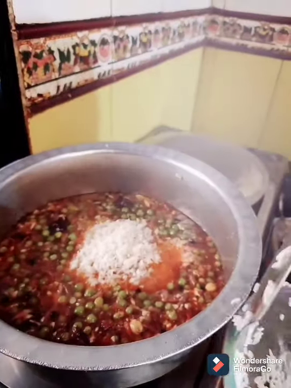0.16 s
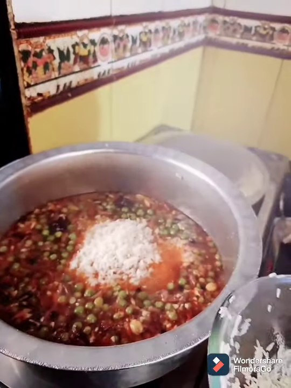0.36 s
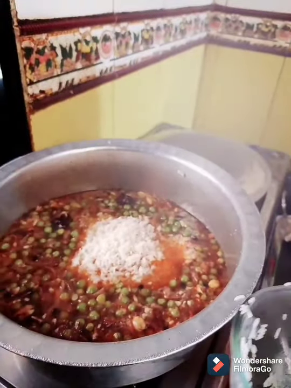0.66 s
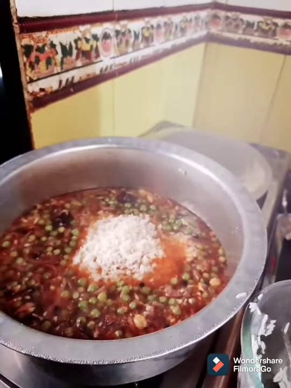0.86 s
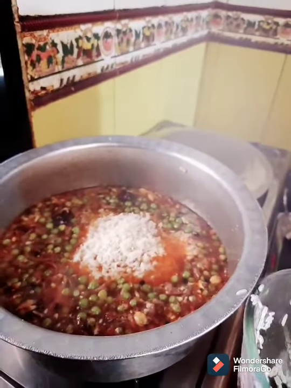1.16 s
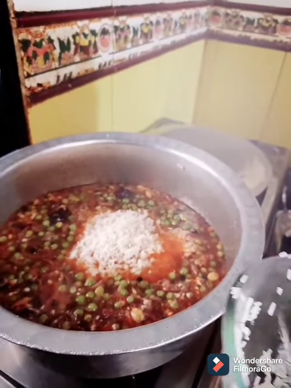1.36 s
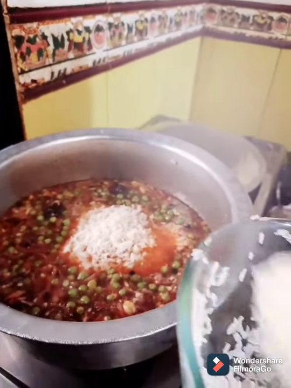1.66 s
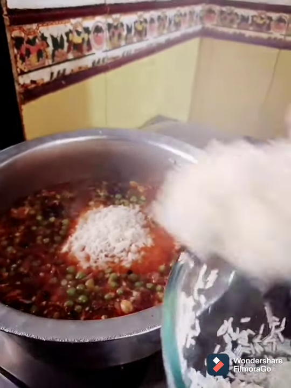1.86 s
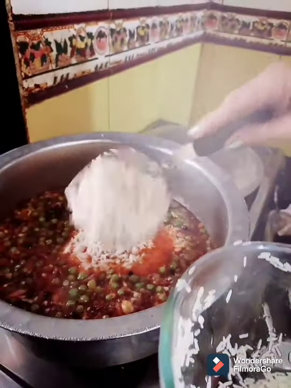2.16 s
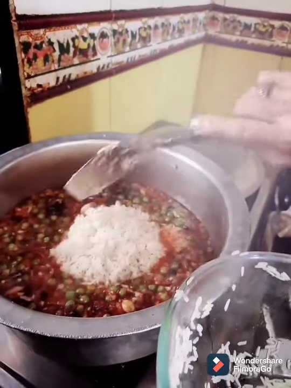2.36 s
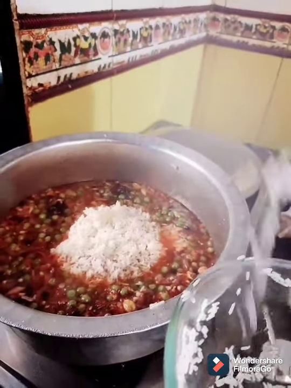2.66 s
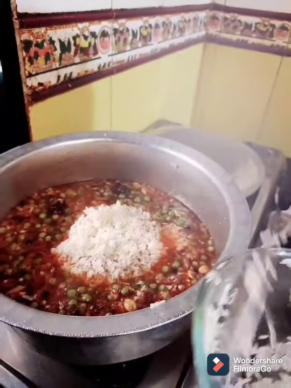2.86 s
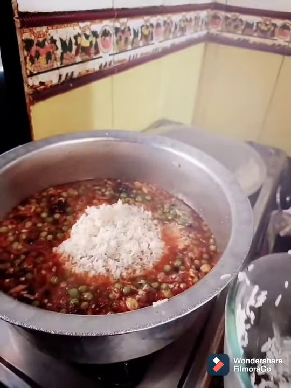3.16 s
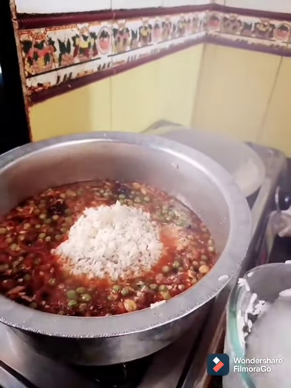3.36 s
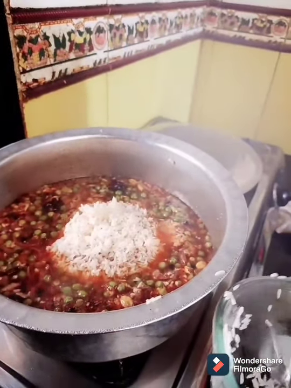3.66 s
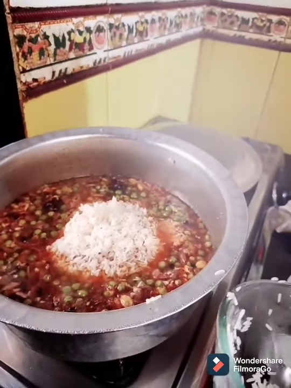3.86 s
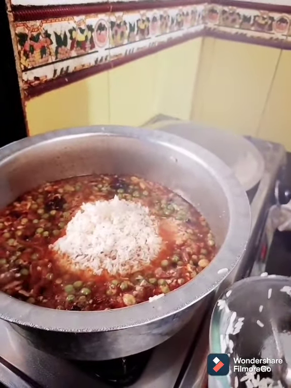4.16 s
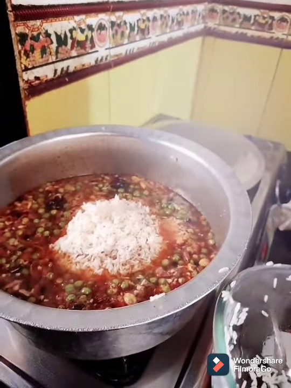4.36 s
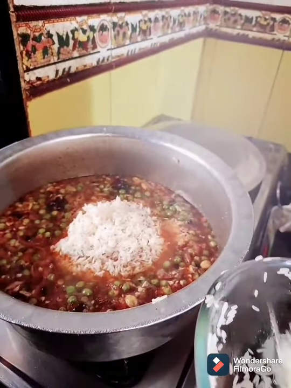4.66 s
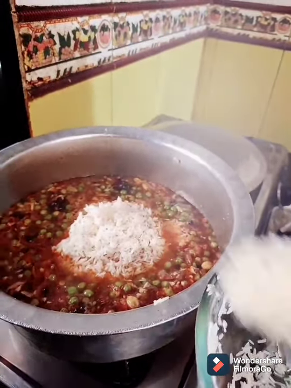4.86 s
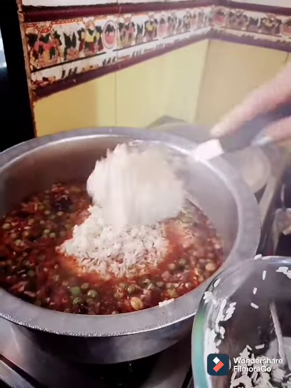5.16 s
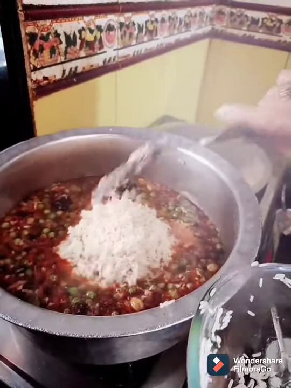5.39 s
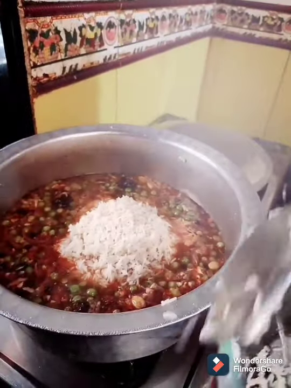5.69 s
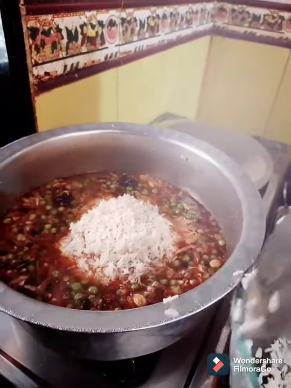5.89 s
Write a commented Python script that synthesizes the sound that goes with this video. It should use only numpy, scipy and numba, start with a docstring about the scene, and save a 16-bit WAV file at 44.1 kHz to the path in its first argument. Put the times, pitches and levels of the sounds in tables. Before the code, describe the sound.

Close in a small tiled kitchen, a steel spoon knocks a glass bowl and rasps through wet rice, with a dull tap on the pot rim. A spoonful of grains patters into the broth, then more scraping and dull touches follow, a second softer patter, and final bright clinks. A pot simmers gently throughout over a rumbling, hissing gas flame.

```python
"""A steel spoon knocks and scrapes in a glass bowl of wet rice: decaying modes, noise cracks and rasping grains.
Air cupped between spoon and bowl hums; two spoonfuls of rice patter into the broth as showers of clicks.
Beside it a wide pot simmers on a gas ring: bubbles are short ringing sines, and the flame is
coloured noise that rumbles and hisses, with narrow resonances.
A phone microphone with gain control stands close by in a small tiled kitchen."""
import sys
import numpy as np
from scipy import signal
from scipy.fft import rfft, irfft, next_fast_len
from scipy.io import wavfile
from scipy.ndimage import uniform_filter1d
from numba import njit

SR = 44100
rng = np.random.default_rng(int(sys.argv[2]) if len(sys.argv) > 2 else 0)


def invert_db(level):
    """Linear amplitude ratio for a level in decibels (20 dB per decade), elementwise."""
    return 10 ** (np.asarray(level, dtype=float) / 20)


def to_wav(sig):
    """Store sig (one row per channel, or 1-D mono) as 16-bit WAV at the path in sys.argv[1].

    Samples outside -1..1 are clipped; the rate is SR.
    """
    pcm = np.clip(np.atleast_2d(sig), -1, 1) * 32767
    pcm = np.round(pcm).astype(np.int16)
    wavfile.write(sys.argv[1], SR, pcm.T)  # frames by channels


N = 265923   # samples
CONTACT_S = .0015   # contact time of a blow

# spoon dragged over rice and glass, one list a stroke:
# (time [s], drag level [dB], lean to spoon ring (+) or bowl ring (-) [dB, before scaling])
SCRAPES = [
    [(0.19, -41, 1), (0.21, -21.5, -10), (0.262, -57, 4), (0.27, -40, 9.5), (0.31, -70, -2)],
    [(0.74, -31, 13), (0.782, -38.5, -4), (0.88, -31, 6), (0.91, -47, -13), (0.916, -50, 2),
     (0.97, -40.5, 7)],
    [(0.99, -47, -4), (1.004, -48, 0), (1.04, -37.5, 3), (1.06, -49, 2), (1.074, -40.5, 4), (1.16, -67, 8)],
    [(3.09, -33, 4), (3.114, -30, 18), (3.174, -25.5, 17), (3.228, -41, 4), (3.25, -41, 4)],
    [(3.26, -43, -1), (3.294, -27.5, 3), (3.378, -81, 7), (3.412, -42, 4), (3.44, -53, 4)],
    [(3.54, -35, -6), (3.578, -40, 11), (3.602, -29, 18), (3.636, -49, 4), (3.665, -56, 4)],
    [(3.69, -36, 15), (3.754, -35.5, 13), (3.78, -52, 4)],
    [(3.81, -46, 4), (3.838, -40, 4), (3.994, -28.5, 2), (4.038, -41.5, 10), (4.12, -47, -4),
     (4.13, -36, 1)],
    [(4.14, -47, 0), (4.348, -44.5, 0), (4.39, -58, 4), (4.444, -49, 6), (4.46, -58, 4), (4.5, -56, 2)],
    [(5.58, -59, -12), (5.64, -60, -20), (5.77, -60, -18), (5.81, -48, -7)],
]


def rms_one(x):
    """Normalization: scale a signal to unit rms."""
    return x / np.sqrt(np.mean(x ** 2) + 1e-20)


def at_hz(points, hz):
    """Logarithmic frequency scale: interpolate a table's second column over log frequency."""
    points = np.array(points)
    return np.interp(np.log(hz), np.log(points[:, 0]), points[:, 1])


def octaves(hz):
    """Musical interval: distance from 3000 Hz in octaves."""
    return np.log2(hz / 3000)


def drift(rate):
    """Low-passed noise: a slow random wander of unit rms, with two poles at rate [Hz]."""
    step = 40   # samples between computed points
    r = np.exp(-2 * np.pi * rate * step / SR)
    white = rng.standard_normal(N // step + 2002)
    slow = signal.lfilter([1], [1, -2 * r, r * r], white)[2000:]
    return np.interp(np.arange(N) / step, np.arange(len(slow)), rms_one(slow))


def grains(per_s, spread_db):
    """Poisson-like impulse train: random clicks of uneven size and sign."""
    sizes = invert_db(spread_db * np.minimum(rng.exponential(1, N), 5)) * rng.choice([-1, 1], N)
    return sizes * (rng.random(N) < per_s / SR)


def ring(clicks, hz, t60):
    """Damped oscillator: a unit click starts a decaying sine of initial height 1."""
    r, w = invert_db(-60 / (t60 * SR)), 2 * np.pi * hz / SR
    return signal.lfilter([0, np.sin(w)], [1, -2 * r * np.cos(w), r * r], clicks + 1e-18)


def resonance(x, hz, width_hz):
    """Driven resonator: a two-pole band-pass with about unit gain at its peak."""
    r = np.exp(-np.pi * width_hz / SR)
    poles = [1, -2 * r * np.cos(2 * np.pi * hz / SR), r * r]
    return signal.lfilter([(1 - r * r) / 2, 0, (r * r - 1) / 2], poles, x)


def colour(x, spectrum):
    """Spectral shaping: filter a steady noise by a table of levels, to unit rms."""
    hz = np.maximum(np.arange(N // 2 + 1) * SR / N, 1)
    return rms_one(irfft(rfft(x) * invert_db(at_hz(spectrum, hz)), N))


def gains(strokes, lean):
    """Friction envelope: drag gain in time, tilted by lean toward spoon or bowl, silent between strokes."""
    t, gain = np.arange(N) / SR, 0
    for stroke in strokes:
        s, drag_db, steel_db = np.transpose(stroke)
        gain = gain + invert_db(np.interp(t, s, drag_db + lean * steel_db, -150, -150))
    return gain


def spoon_in_bowl():
    """Modal excitation: blows and friction drive glass, steel and pot; cracks, rasp and hum join them."""
    # clear clinks: (time [s], bowl ring [dB], spoon ring [dB], knock [dB], hardness [dB per octave])
    blows = [(0.0445, -13.5, -15, -21.5, 2), (0.085, -35, -27.5, -14.5, 3), (0.2064, -30.5, -45, -33, 2),
             (0.6301, -34, -16, -38, 0), (0.6997, -26.5, -21.5, -30.5, -1), (3.0755, -50, -30.5, -48, 1),
             (3.5304, -60, -34, -60, -3.5), (3.6711, -39, -33, -45, 0), (5.8195, -14.5, -22, -29, 2),
             (5.9926, -21.5, -32, -22.5, 2), (6.0027, -31, -46, -28, 1)]
    # dull touches cushioned by rice: (time [s], crack level [dB], hardness [dB per octave])
    soft_blows = [(0.268, -18, 1), (0.9192, -17.5, -2.5), (1.0748, -20, -4.5), (3.5165, -24, -2),
                  (3.7861, -2, -3.5), (4.085, -19.5, -6), (4.1658, -18.5, -8), (4.2605, -26, 0.5),
                  (4.339, -26.5, 2), (4.4363, -40, 8), (5.4814, -36, 6.5), (5.7883, -21, -3)]
    # taps on the pot rim: (time [s], crack level [dB], ring level [dB], hardness [dB per octave])
    pot_blows = [(0.0, -15, -28.5, -4.5), (0.083, 3, -23.5, -4.5), (0.4805, -8.5, -25.5, -4),
                 (2.668, -19, -42, -6.5), (4.694, -26, -47, -4)]
    # modes of the glass bowl: (frequency [Hz], relative level [dB], t60 before the cap in struck [s])
    bowl_modes = [(1435, -7.5, 0.09), (2250, -14, 0.27), (2525, -6.5, 0.15), (2570, -9.5, 0.12),
                  (3530, -17, 0.11), (3953, -5, 0.11), (3994, -2, 0.049), (5500, -37, 0.067),
                  (5633, 2.5, 0.055), (7000, -19.5, 0.089), (7870, -3.5, 0.085), (7980, 4, 0.041),
                  (8040, -3, 0.078), (8430, -19, 0.1), (9000, -4, 0.15), (10260, -6, 0.14),
                  (10200, 0.5, 0.047), (10830, -14, 0.24), (12430, -7, 0.18), (12800, -29, 0.19),
                  (13670, -11, 0.087), (15450, -16, 0.063)]
    # modes of the steel spoon, same columns: (frequency [Hz], relative level [dB], t60 before the cap [s])
    spoon_modes = [(2680, -11.5, 0.049), (2786, -1, 0.045), (3845, -6.5, 0.053), (4304, -2, 0.061),
                   (4600, -11, 0.15), (5600, -27, 0.11), (6080, -18, 0.24), (5906, -4, 0.091),
                   (6600, -29, 0.087), (7510, -9, 0.11), (8100, -9.5, 0.074), (8000, -8.5, 0.2),
                   (8710, -5.5, 0.14), (8600, -10.5, 0.054), (9520, -2.5, 0.17), (10060, -25, 0.088),
                   (11480, -9.5, 0.23), (11000, -21, 0.092), (11540, -19, 0.096), (12460, -14, 0.078),
                   (12750, -9, 0.11), (13500, -15, 0.074), (14400, -13, 0.088), (15500, -1, .08)]
    # whole bowl flexing: (frequency [Hz], relative level [dB], t60 [s])
    knock_modes = [(604, -1, 0.08), (642, -7, 0.057), (701, -18, 0.1), (886, -22, 0.064)]
    # modes of the pot: (frequency [Hz], relative level [dB], t60 [s])
    pot_modes = [(296, -27.5, 0.17), (1136, -20, 0.074), (1196, -12.5, 0.14), (1550, -10.5, 0.051),
                 (1840, -12, 0.091), (1834, -13, 0.086), (2474, -7, 0.051), (2717, 3.5, 0.025),
                 (3160, -17, 0.14), (3930, -9.5, 0.12), (4150, -43, 0.14), (6360, -17, 0.093)]
    clink_crack_db = 18.5   # crack of a clink over its louder ring
    touch_ring_db, touch_knock_db = -30.5, -29   # ring and knock of a touch relative to its crack
    bowl_rub_db, spoon_rub_db = -42, -41.5   # drive by the drag
    thud_cut_hz = 550

    clinks = [(s, max(bowl, spoon) + clink_crack_db, bowl, spoon, knock, hard)
              for s, bowl, spoon, knock, hard in blows]
    touches = [(s, db, db + touch_ring_db, db + touch_ring_db, db + touch_knock_db, hard)
               for s, db, hard in soft_blows]
    s, crack_db, bowl_db, spoon_db, knock_db, hardness = np.transpose(sorted(clinks + touches))
    pot_s, pot_crack_db, pot_db, pot_hardness = np.transpose(pot_blows)

    rub = rms_one(grains(3700, spread_db=6.0))
    bowl_rub = rub * gains(SCRAPES, -0.65) * invert_db(bowl_rub_db)
    spoon_rub = rub * gains(SCRAPES, 0.27) * invert_db(spoon_rub_db)
    no_rub = np.zeros(N)
    rings = struck(bowl_modes, s, bowl_db, hardness, bowl_rub)
    rings += struck(spoon_modes, s, spoon_db, hardness, spoon_rub)
    rings += struck(knock_modes, s, knock_db, 0, no_rub)
    rings = signal.sosfilt(signal.butter(4, thud_cut_hz, "high", fs=SR, output="sos"), rings)
    rings += struck(pot_modes, pot_s, pot_db, pot_hardness, no_rub, rattle_t60=0.024, chatter=0.27)
    crack = cracks(s, crack_db, hardness) + cracks(pot_s, pot_crack_db, pot_hardness)
    return rings + crack + rasp() + hollow()


def struck(modes, s, blow_db, hardness, rub, rattle_t60=0.031, chatter=0.16):
    """Modal superposition: each blow excites each mode unevenly; greater hardness tilts it brighter."""
    blur_share, blur_per_s = .008, 50   # hand and rice load the walls, so each mode wavers in pitch
    wander_db, wander_per_s = 4.5, 12   # the moving contact favours now one mode, now another
    longest_t60 = .22   # s
    at, out = np.maximum((s - CONTACT_S / 2) * SR, 0).astype(int), np.zeros(N)
    uneven_db = rng.normal(0, 2.4, (len(s), len(modes)))
    noise = grains(9000, spread_db=3.0)
    waver = 1 + blur_share * drift(blur_per_s)
    fade = invert_db(-60 / (rattle_t60 * SR))
    for k, (hz, level_db, t60) in enumerate(modes):
        strengths = invert_db(blow_db + hardness * octaves(hz) + level_db + uneven_db[:, k])
        pole = invert_db(-60 / (min(t60, longest_t60) * SR))
        wander = invert_db(level_db + wander_db * drift(wander_per_s))
        # each mode reads the waver from another starting point
        turn = 2 * np.pi * hz / SR * np.roll(waver, k * N // len(modes))
        out += rattle(at, strengths, noise, rub * wander, pole, turn, fade, chatter)
    return out


@njit
def rattle(at, strengths, noise, rub, pole, turn, fade, chatter):
    """Forced damped oscillator: one mode driven by clicks, the dying rattle after each, and rubbing."""
    out, loose, j = np.zeros(len(noise)), 0., 0
    for i in range(2, len(noise)):
        push = rub[i]
        if j < len(at) and i >= at[j]:
            push += strengths[j]
            loose += chatter * strengths[j]
            j += 1
        loose *= fade
        drive = np.sin(turn[i]) * (push + loose * noise[i])
        out[i] = 2 * pole * np.cos(turn[i]) * out[i - 1] - pole * pole * out[i - 2] + drive
    return out


def cracks(s, crack_db, hardness):
    """High modal density: countless close modes blur to noise that swells briefly and dies band by band."""
    # spectrum of a crack: (frequency [Hz], relative density [dB per Hz])
    density = [(180, -58), (300, -26), (1400, -10.5), (1860, -1), (2550, -24), (3110, -11.5), (3990, 0.5),
               (4790, -3.5), (15800, -4.5)]
    # longer dying of a crack: (frequency [Hz], t60 [s])
    dying_t60 = [(300, 0.065), (1000, 0.056), (4000, 0.094), (15000, 0.16)]
    snap_t60_s, snap_db = 0.025, 2   # the first instants of a crack, over its longer dying
    out, edges = np.zeros(N), 300 * 2 ** np.arange(0, 5.8, .38)   # Hz
    white, at = rng.standard_normal((2, N)), np.maximum((s - CONTACT_S) * SR, 0).astype(int)
    uneven_db = rng.normal(0, 0.89, (len(s), len(edges)))
    swell = np.exp(-1 / (CONTACT_S * SR))
    snap_pole = invert_db(-60 / (snap_t60_s * SR))
    for k, (low, high) in enumerate(zip(edges, edges[1:])):
        hz, hits = np.sqrt(low * high), np.full(N, 1e-18)
        hits[at] = invert_db(crack_db + hardness * octaves(hz) + at_hz(density, hz) - 13.0 + uneven_db[:, k])
        pole = invert_db(-60 / (at_hz(dying_t60, hz) * SR))
        envelope = signal.lfilter([1 - swell], np.convolve([1, -pole], [1, -swell]), hits)
        snap = signal.lfilter([1 - swell], np.convolve([1, -snap_pole], [1, -swell]), hits)
        envelope += invert_db(snap_db) * snap
        band = signal.butter(2, [low, high], "band", fs=SR, output="sos")
        out += envelope * signal.sosfilt(band, white[k % 2])
    return out


def rasp():
    """Granular friction: wet grains grate under the spoon; the shifting heap rings in changing bands."""
    # spectrum of the grating: (frequency [Hz], relative level [dB])
    drag_spectrum = [(590, -20), (1000, -42.5), (1450, -4), (1840, -15.5), (2430, -0.5), (2800, -16),
                     (3290, -7), (4000, -3.5), (5460, -1.5), (6420, -1), (13400, -0.5), (15800, -11)]
    rasp_db = -2   # over the drag level
    patchy_db, shifts_per_s, width_share = 4, 12, .05   # bands that come and go; width over frequency
    grating, patches = colour(grains(6000, spread_db=2.5), drag_spectrum), 0
    for k, hz in enumerate(np.geomspace(1400, 15000, 24)):
        favour = invert_db(patchy_db * drift(shifts_per_s))
        patches = patches + (-1) ** k * favour * resonance(grating, hz, width_share * hz)
    return invert_db(rasp_db + 2.0 * drift(40)) * gains(SCRAPES, 0) * rms_one(patches)


def hollow():
    """Cavity resonance: air cupped between spoon and bowl hums roughly at a pitch set by the gap."""
    # hums of the cupped air: (time of peak [s], level [dB], frequency [Hz], spread of the swell [s])
    cups = [(.815, -39.5, 768, 0.017), (.925, -43, 785, 0.014), (3.109, -43, 1680, 0.011),
            (3.149, -39, 1510, 0.011), (3.272, -36, 863, 0.012), (3.755, -48, 700, 0.0089),
            (3.791, -33.5, 770, 0.01), (3.964, -41, 768, 0.031)]
    width_hz = 103   # rate of the random wander around the pitch
    s, db, hz, swell_s = np.transpose(cups)
    t = np.arange(N) / SR
    k = np.searchsorted((s[1:] + s[:-1]) / 2, t)   # nearest hum
    phase = 2 * np.pi * np.cumsum(hz[k]) / SR
    gain = invert_db(db[k]) * np.exp(-.5 * ((t - s[k]) / swell_s[k]) ** 2)
    return gain * (drift(width_hz) * np.cos(phase) + drift(width_hz) * np.sin(phase))


def rice():
    """Shot noise: thousands of wet grains patter into the broth, swelling fast and thinning slowly."""
    # rice sliding off the spoon: (time of peak [s], level [dB])
    pours = [(2.392, -39), (5.418, -42)]
    # spectrum of the patter: (frequency [Hz], relative level [dB])
    patter = [(880, -29), (1500, -6), (2200, -3), (2310, -7), (3430, -3.5), (10800, -1.5), (15800, -11.5)]
    rise_db_per_s, fall_db_per_s = 500, 150
    t = np.arange(N) / SR
    gain = sum(invert_db(db + np.minimum(rise_db_per_s * (t - s), fall_db_per_s * (s - t))) for s, db in pours)
    return gain * colour(grains(4000, spread_db=2.5), patter)


def bursts(per_s, low_hz, high_hz, cycles, level_db):
    """Bubble oscillation: random bursts ring at scattered pitches, falling 60 dB in the given cycles."""
    born = grains(per_s * invert_db(2.7 * drift(4.1)), spread_db=4.0)
    dealt = rng.integers(0, 14, N)   # which pitch each bubble gets
    pitches = np.geomspace(low_hz, high_hz, 14)
    return invert_db(level_db) * sum(ring(born * (dealt == k), hz, cycles / hz) for k, hz in enumerate(pitches))


def flame():
    """Combustion noise: lumpy rumble, smooth hiss and narrow resonances of burner and pot."""
    # spectrum of the rumble: (frequency [Hz], relative level [dB])
    rumble = [(13, -19), (22, -3.5), (37, -0.5), (65, -2.5), (123, -13), (146, -9.5), (196, -15),
              (258, -24), (297, -21.5), (354, -27.5), (450, -27.5), (580, -14), (990, -120)]
    # spectrum of the hiss: (frequency [Hz], relative level [dB])
    hiss = [(240, -62), (400, -10), (625, -4.5), (775, -7.5), (850, -2.5), (976, -9), (1550, -7.5),
            (1700, -10.5), (2210, -12.5), (3290, -17.5), (10900, -13), (11600, -11), (15800, -14)]
    # resonances of burner and pot: (frequency [Hz], width of each of two passes [Hz], level [dB])
    whistles = [(59.8, 21, -53.5), (151.5, 10.6, -58.5), (203.2, 9.9, -59), (552.6, 40, -61.5),
                (630, 16, -57.5), (6110, 45, -62), (11770, 280, -57)]
    rumble_db, hiss_db = -42, -44   # about which the levels drift
    out = invert_db(rumble_db + 0.88 * drift(4.9)) * colour(rng.standard_normal(N), rumble)
    out += invert_db(hiss_db + .5 * drift(1.0) + 0.9 * drift(50)) * colour(rng.standard_normal(N), hiss)
    for hz, width_hz, level_db in whistles:
        once = resonance(rng.standard_normal(N), hz, width_hz)
        out += invert_db(level_db) * rms_one(resonance(once, hz, width_hz))
    return out


def kitchen(x):
    """Reverberation by recirculation: ten parallel feedback delays, duller on every round."""
    t60_s, wall_cut_hz = 0.32, 13500   # t60 at low frequencies; corner of the loss per round
    size = next_fast_len(N + SR)
    turn = -2j * np.pi * np.arange(size // 2 + 1) / size   # phase of one sample's delay
    dull, answer = np.exp(-2 * np.pi * wall_cut_hz / SR), 0
    walls = (1 - dull) / (1 - dull * np.exp(turn))
    lags = (np.geomspace(.009, .031, 10) * SR * rng.uniform(0.98, 1.05, 10)).astype(int)
    for k, lag in enumerate(lags):
        trip = invert_db(-60 * lag / SR / t60_s) * walls * np.exp(turn * lag)
        answer = answer + (-1) ** k * trip / (1 - trip)
    return irfft(rfft(x, size) * answer, size)[:N]


def scene():
    """Superposition: spoon and rice with their reverberation, simmer and flame at one microphone."""
    near = spoon_in_bowl() + rice()
    simmer = bursts(150, 525, 1550, cycles=18.0, level_db=-66)
    ticks = bursts(25, 5900, 8500, cycles=59.0, level_db=-48.5)
    kitchen_db = -15.5
    return (near + invert_db(kitchen_db) * kitchen(near) + simmer + ticks + flame())[None]


def top_cut(x):
    """Nothing passes above the cut-off."""
    return signal.sosfilt(signal.butter(12, 16680, fs=SR, output="sos"), x)


def record(dry):
    """Dynamic compression: gain ducks after loud blows and creeps back; peaks are rounded, the top is cut."""
    level_db = 10 * np.log10(uniform_filter1d(dry[0] ** 2, size=441) + 1e-12)
    fall_db = 72.0 * np.arange(N) / SR   # the held level falls 72 dB per second
    held_db = np.maximum.accumulate(level_db + fall_db) - fall_db
    duck_db = -.16 * np.maximum(held_db + 38.5, 0)   # 0.16 dB for each dB above -38.5 dB
    r = np.exp(-1 / (0.011 * SR))   # 11 ms smoothing of the gain
    x = dry * invert_db(signal.lfilter([1 - r], [1, -r], duck_db))
    x = np.tanh(x)
    x = signal.sosfilt(signal.ellip(8, .5, 26, 15650, fs=SR, output="sos"), x)
    x = signal.sosfilt(signal.cheby2(16, 40, 16700, fs=SR, output="sos"), x)
    return top_cut(x)


dry = scene()
out = record(dry)
to_wav(out)
```